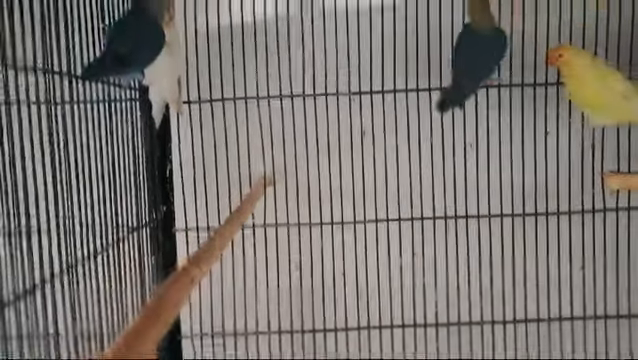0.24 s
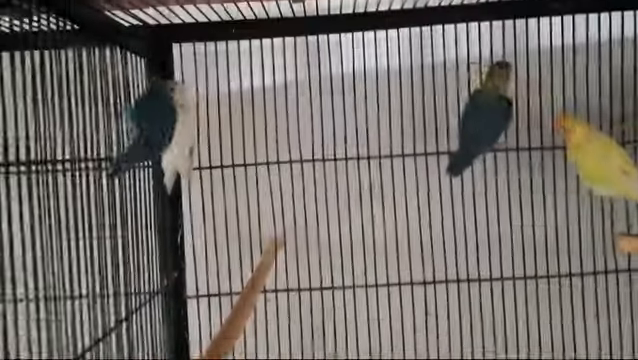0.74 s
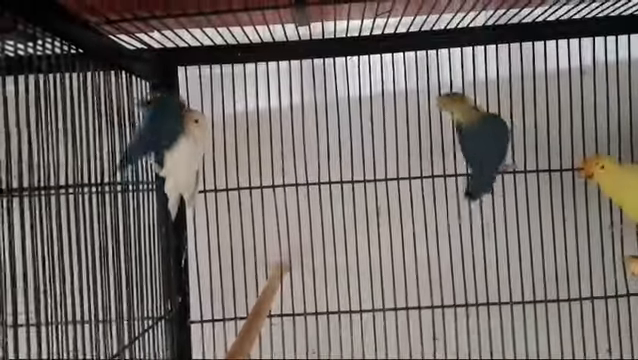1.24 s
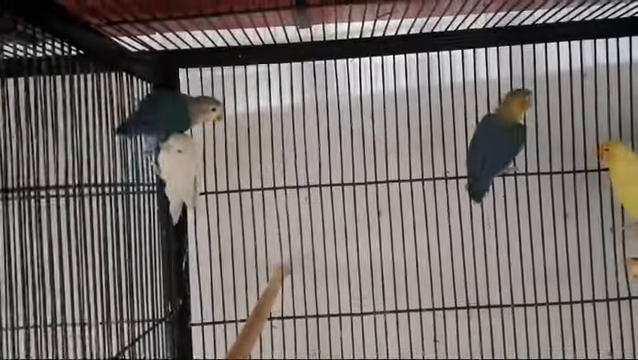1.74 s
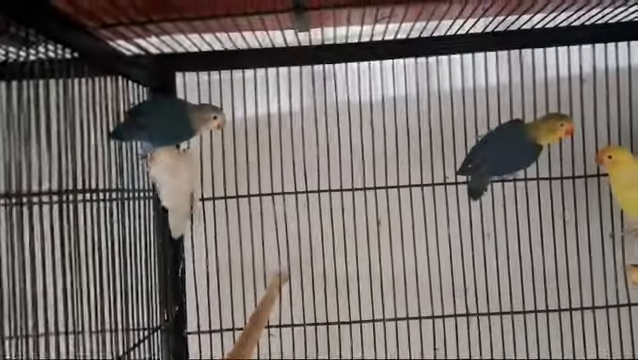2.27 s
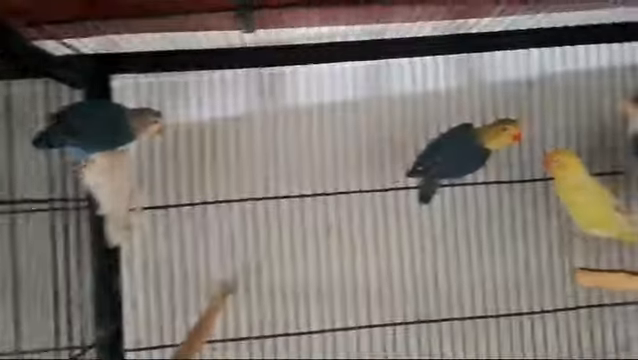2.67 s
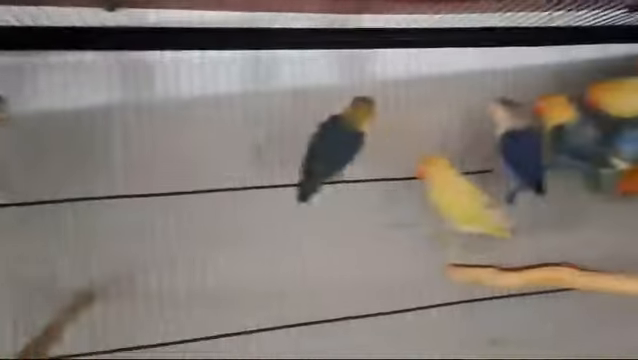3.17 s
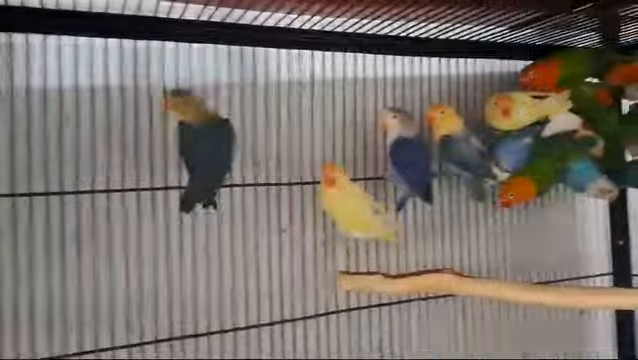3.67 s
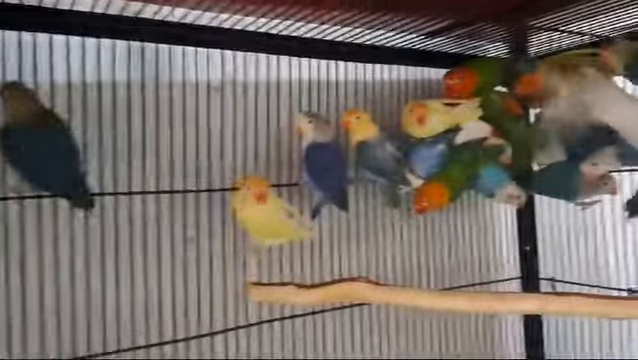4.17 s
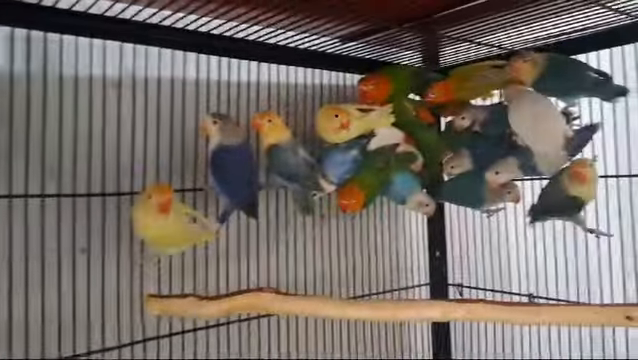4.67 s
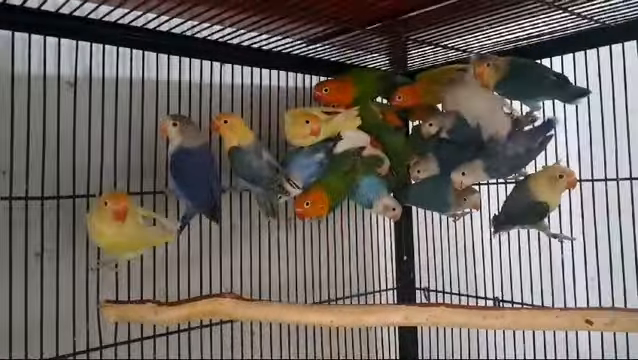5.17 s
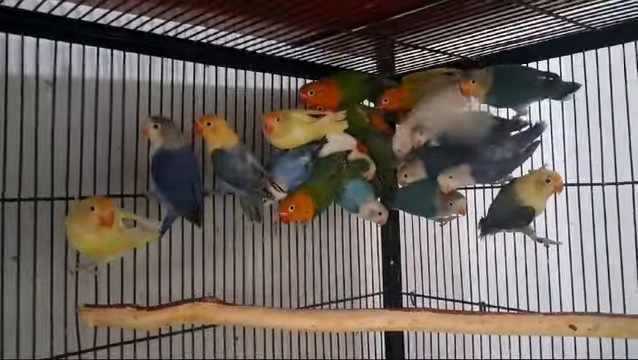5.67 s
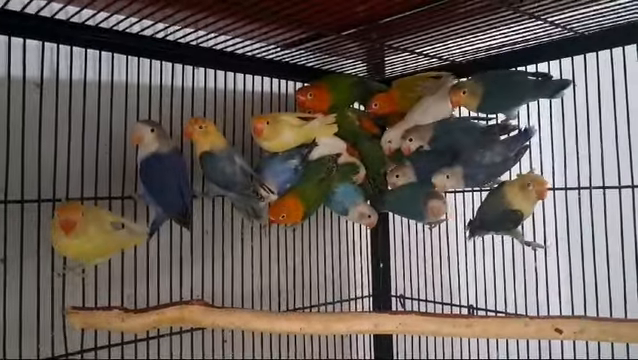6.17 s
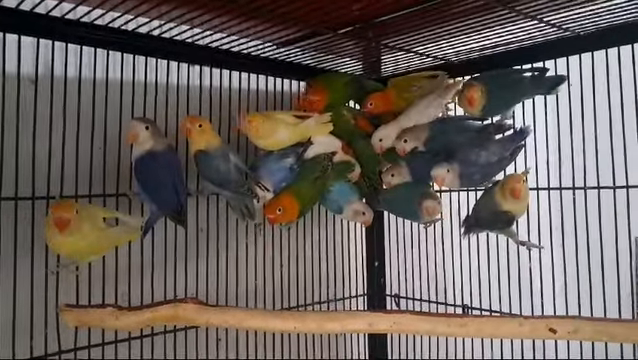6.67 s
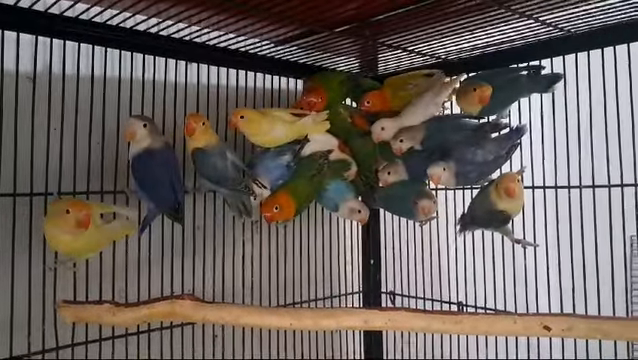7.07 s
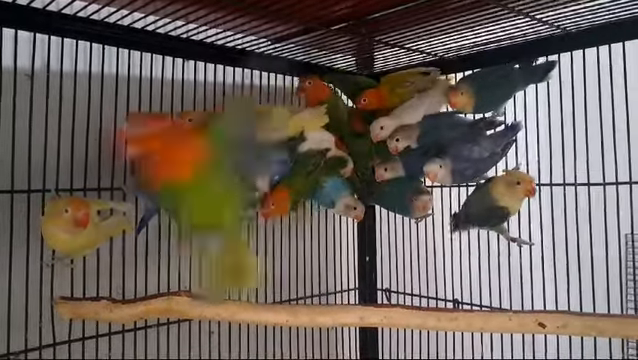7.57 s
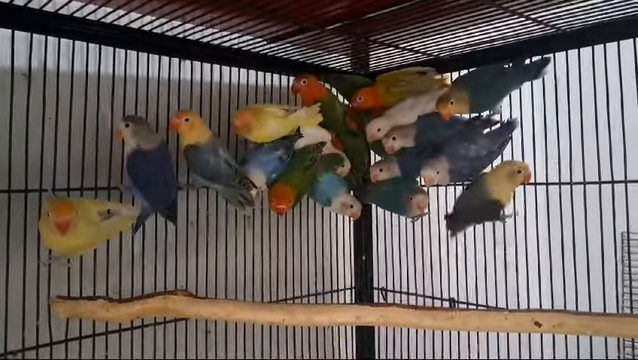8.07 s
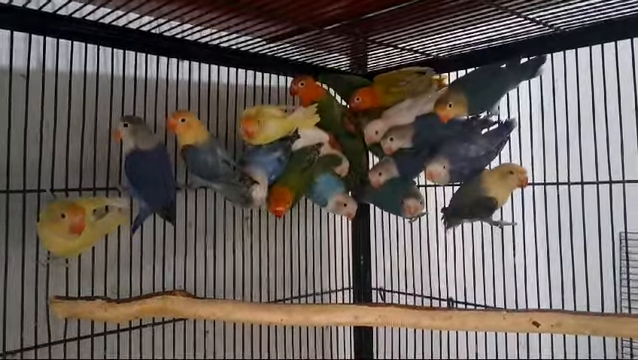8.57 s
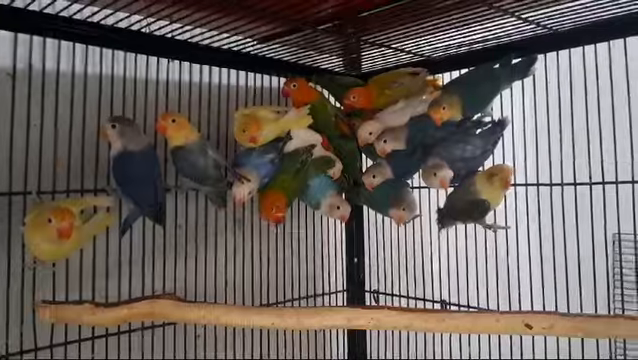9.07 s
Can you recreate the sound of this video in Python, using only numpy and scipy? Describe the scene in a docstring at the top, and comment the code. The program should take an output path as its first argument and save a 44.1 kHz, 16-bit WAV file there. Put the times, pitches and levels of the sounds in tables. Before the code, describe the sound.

Lovebirds chatter close to the microphone in a wire cage, mostly a little to the right, and the small hard room rings briefly after each call. From the start, short, shrill chirps and squeaks mix with reedy squawks and dry beak ticks. The birds fall almost silent from about 2.3 to 2.9 seconds, then chirp again, several calls a second, with a few more ticks around 4 to 6.5 seconds. Between 6.3 and 7.2 seconds a squabble brings three harsh, pulsing rasps, and rough squawks carry on until 7.8 seconds. Around 8 seconds a soft, low gust from wings brushes the microphone. After another short lull, chirps return from 8.7 seconds to the end, just past 9 seconds. Further off, the rest of the flock twitters and rustles its feathers in swelling bouts, over a faint low hum and room tone.

```python
"""Lovebirds chatter in a wire cage in a small hard room, close to a camera's stereo microphone.
Each bird sings with a membrane in its syrinx, coloured by throat and beak: most chirps start in a
reedy low register and break into a whistle, squawks stay low, and squabbling birds rasp in pulses.
Beaks tick nearby and the room rings. Further off the flock twitters and feathers rustle;
wing draught brushes the microphone, over a low hum and room tone."""
import sys
import numpy as np
from scipy import signal
from scipy.fft import rfft, irfft, next_fast_len
from scipy.io import wavfile
from scipy.ndimage import map_coordinates

SR = 44100
rng = np.random.default_rng(int(sys.argv[2]) if len(sys.argv) > 2 else 0)


def put_to_file(sound):
    """Save the sound as 16-bit audio at rate SR, in the file named by the first command-line argument."""
    columns = np.atleast_2d(sound).T  # one column per channel
    safe = np.clip(columns, -1, 1)
    whole_steps = np.round(safe * 32767)
    wavfile.write(sys.argv[1], SR, whole_steps.astype(np.int16))


N = 411453
TOP_HZ = 16000  # the microphone's band limit

OPENING_HZ, OPENING_S = 2131, 0.0098  # pitch and usual length of a chirp's reedy opening
SCOOP_CARRY, DROOP = 0.24, .045  # share of the scoop that carries on past the crest; final sag
CLEAN_SCOOP = 0.12  # the further from this arc, the rougher the whistle
# Chirps close to the microphone; a negative scoop falls to the crest from above.
# (time [s], opening [s, 0 = none], whistle [s], crest [Hz], scoop [share of crest],
#  relative level [dB], treble against body [dB], left minus right [dB])
NEAR_CHIRPS = [(.201, 0, 0.015, 5960, 0.064, -12.5, -30, -9.5),
               (0.633, 0, 0.021, 6300, -.05, -12.5, -7.5, -12.5),
               (0.65, 0.00067, .038, 6640, .14, -11, -11, -11),
               (.82, 0.00085, 0.022, 6390, -0.17, -12.5, -9.5, -13.5),
               (.844, 0, 0.02, 4334, -.05, -12.5, -6, -3), (.864, 0, 0.029, 6890, .11, -9.5, -15, -5.5),
               (.986, 0.011, 0.05, 6110, .07, -15, -9, -16.5),
               (1.042, 0.0025, .058, 6790, 0.036, -13, -21, -12),
               (1.096, 0.0014, .06, 5970, -0.13, -13, -12, -8.5),
               (1.288, 0.0037, 0.021, 6370, .24, -12.5, -11.5, -3.5),
               (1.325, 0.0025, 0.043, 5240, -.1, -17, -15, -9),
               (1.495, 0.00025, 0.017, 6210, .08, -10.5, -15, -8),
               (1.561, 0.0066, 0.017, 4710, 0.29, -23, -12.5, 3),
               (1.64, 0.0023, .035, 4767, .08, -21, -7, -3),
               (1.743, 0.0039, .036, 4620, .11, -26.5, 1, -3.5),
               (1.832, 0.0033, 0.035, 4590, 0.091, -24.5, -3, -2.5),
               (1.928, 0.0065, .03, 4450, 0.034, -24.5, -1, -5),
               (2.059, 0.00061, .036, 5540, 0.19, -15, -14, -2),
               (2.163, 0.0039, 0.045, 5580, 0.18, -15, -16, -7),
               (2.972, 0.0033, .067, 5210, .1, -17.5, -13.5, -4),
               (2.986, 0.0027, 0.04, 6547, .06, -13.5, -17.5, -7),
               (3.297, 0.021, 0.038, 5470, .15, -12.5, -11.5, -3),
               (3.329, 0.00065, 0.047, 6570, .09, -16, -12.5, -9.5),
               (3.416, 0.0064, 0.024, 6260, .08, -15.5, -7, -10),
               (3.488, 0.0011, 0.037, 5490, .04, -13.5, -17.5, -6.5),
               (3.521, 0, 0.03, 4376, .1, -13, -13, 2), (3.541, 0.0033, 0.039, 5380, 0.2, -12.5, -10, -1.5),
               (3.56, 0.0022, .031, 6710, .04, -17, -16.5, -8.5),
               (3.619, .016, 0.026, 6270, 0.21, -19, -21, -10.5), (3.845, 0, 0.072, 6360, .04, -14, -9, -7),
               (3.887, 0.0012, .038, 5455, .14, -10.5, -15, 1.5),
               (4.05, 0.0001, .015, 6500, .2, -24.5, -13.5, -4.5),
               (4.131, 0.01, .037, 5340, 0.082, -11.5, -9.5, 3),
               (4.289, 0.015, 0.027, 6320, 0.17, -18.5, -22.5, -1),
               (4.369, .011, .032, 5316, .1, -11.5, -8.5, 0),
               (4.458, 0.0085, 0.037, 6200, .12, -14, -12.5, -12),
               (4.597, .012, 0.033, 5330, .13, -12.5, -11.5, -3),
               (4.846, 0.01, 0.026, 5356, 0.12, -10.5, -15, -5.5),
               (5.054, 0.0067, 0.02, 4480, .18, -13, -9.5, -9),
               (5.122, 0.0016, .018, 4330, -.13, -10, -14, -12), (5.142, 0, .055, 6050, 0, -14, -14, -10),
               (5.195, 0.0036, .016, 4314, -0.094, -14.5, -17.5, -8),
               (5.25, 0.0058, 0.025, 6220, .09, -15.5, 3, -16.5),
               (5.362, 0.0074, .027, 5448, .1, -13, -8, -6), (5.389, 0, 0.015, 6470, .1, -23, -8, -19),
               (5.461, .01, .033, 5166, -.07, -11.5, -11, -6.5),
               (5.522, 0.012, 0.026, 5910, .05, -22, -5, -10),
               (5.554, 0.017, 0.024, 5390, -.15, -12.5, -9.5, -7),
               (5.653, 0.0092, .03, 5273, -.14, -16.5, -7.5, -11.5),
               (5.704, 0.00026, 0.031, 6224, 0.21, -15.5, -15, -9),
               (5.748, .011, 0.04, 5300, -0.22, -17, -5, -7.5), (5.794, 0, .036, 4240, .08, -18, -19, -7),
               (5.843, 0.0004, .044, 6474, .07, -16.5, -13, -6),
               (6.061, .02, 0.028, 6150, 0.005, -15.5, -14, -6),
               (6.132, 0.011, 0.024, 6300, .13, -22.5, -9, -16),
               (6.188, 0.0061, .026, 6210, .14, -18.5, 3.5, -20.5),
               (6.235, 0, .026, 6180, 0, -21.5, -12.5, -7),
               (6.346, 0.00095, .038, 6190, .01, -14.5, -13.5, -7),
               (6.484, 0.0045, .042, 5930, .08, -18, -10, -4.5),
               (6.606, 0, .034, 5771, 0.048, -16.5, -8.5, -13.5),
               (6.642, 0.00051, .024, 6500, .1, -12.5, -18.5, -14),
               (6.733, 0.017, 0.049, 5740, 0.22, -15, -10, -9),
               (6.841, 0.00016, .03, 6340, 0.11, -13.5, -14, -9.5),
               (6.905, 0, 0.029, 5870, 0, -14, -8.5, -8), (7.698, 0.014, 0.035, 5820, 0.18, -15.5, -6, -11),
               (7.831, 0.0072, 0.033, 5450, 0.11, -14.5, -7.5, -10),
               (7.944, .01, 0.031, 5395, .06, -18, -5, -7.5),
               (8.049, 0.0035, .028, 6160, .06, -14.5, -2, -16), (8.553, 0, .065, 6520, -.16, -34, -10, -7),
               (8.716, 0.0099, 0.025, 6270, 0.0012, -13, -5, -13.5),
               (8.748, 0.00023, .036, 5370, -0.046, -14, -12, -13),
               (8.92, 0.0094, .032, 6040, .12, -11.5, -13, -7),
               (9.118, .014, .04, 4330, .09, -12.5, -16, -9.5),
               (9.17, 0, 0.072, 6467, .09, -13.5, -13, -7.5)]


def chirps():
    """A short reedy opening breaks with a crack into a whistle that scoops to its crest."""
    out = np.zeros((2, N))
    for s, opening, length, crest, scoop, db, bright_db, pan_db in NEAR_CHIRPS:
        if opening > 0:
            low = reed(opening + 0.0016, OPENING_HZ * rng.normal(1, .02), rise=.05, rough=0.41)
            low = beak(low, .5 * bright_db - 3)  # the beak is only partly open
            # a longer opening spreads the same push and is softer
            push_db = db - 1.5 - 3 * max(np.log2(opening / OPENING_S), 0)
            add(out, s, perch(low, push_db, 0.19 * pan_db))  # beamed less to one side
        contour = crest * np.array([1 - scoop, 1, 1 + SCOOP_CARRY * scoop - DROOP])
        rough = 0.092 + 1.12 * abs(scoop - CLEAN_SCOOP)
        whistle = syrinx(length, contour, rough, jitter=0.096, flutter=12, hiss=1.3)
        n = len(whistle)
        crack = .75 * noise(THROAT_GAIN, n) * np.exp(-np.arange(n) / SR / .004)
        call = (whistle + crack) * swell(n, attack_s=.0025, release_s=.008)
        add(out, s + opening, perch(beak(call, bright_db), db, pan_db))
    return out


# Resonance of the throat and open beak: (frequency [Hz], gain [dB])
THROAT_GAIN = [(1400, -57), (1900, -19.5), (2300, -11), (2750, -5.5), (3300, -3.5), (4300, 2.5), (5400, 5),
               (6600, 1), (7700, -7.5), (9000, -9.5), (10500, -5), (12400, -1), (13500, -7), (16000, -19)]


def syrinx(length, contour, rough, jitter, flutter, hiss, warble=.035, lift=0, lift_s=0.00387):
    """A membrane glides through three pitches; roughness shakes it and adds turbulence."""
    n = int(length * SR)
    progress = np.arange(n) / n
    start, crest, end = contour
    approach = np.clip(1 - progress / .35, 0, 1) ** 2
    departure = np.clip((progress - .35) / .65, 0, 1) ** 2
    pitch = crest + (start - crest) * approach + (end - crest) * departure
    flick = lift * np.exp((progress - 1) * length / lift_s)  # upward, as the note stops
    pitch *= 1 + (0.006 + warble * rough) * wobble(219, n) + flick
    phase = phase_of(pitch * (1 + jitter * rough * wobble(1102.5, n)))
    harmonic = np.arange(1, 9)[:, None]
    gains = amp(along(THROAT_GAIN, harmonic * pitch)) * (harmonic * pitch < TOP_HZ)
    tone = np.sum(gains * np.sin(harmonic * phase), axis=0)
    shake = amp(flutter * rough * np.tanh(wobble(400, n)))  # the membrane's swing is bounded
    return (unit(tone) + hiss * rough ** 2 * noise(THROAT_GAIN, n)) * shake


def reed(length, hz, rise, rough):
    """The membrane's wavering low register; the shorter the note, the more abruptly it starts."""
    contour = hz * np.array([1 - .35 * rise, 1, 1 + .65 * rise])
    note = syrinx(length, contour, rough, jitter=.08, flutter=5.4, hiss=1.47, warble=0.0467, lift=.1)
    return note * swell(len(note), attack_s=0.13 * length, release_s=0.0032)


def beak(call, bright_db, treble_hz=7600):
    """The beak's opening sets the strength of the treble against the body of the call."""
    body = filtered(call, lambda hz: 1 / (1 + (hz / treble_hz) ** 24))
    return unit(body) + amp(bright_db) * unit(call - body)


def perch(call, db, pan_db, lag_s=.0004, wall_db=-12, reach_s=.022, echoes=8):
    """A call meets the microphone's left port first; nearby walls and roof add quick echoes."""
    paths = np.zeros((2, int(reach_s * SR) + 200))
    right_delay = int(abs(lag_s * SR * rng.normal(1, .15)))
    paths[0, 0] = paths[1, right_delay] = 1
    for port in paths:
        late = rng.uniform(.06, 1, echoes)
        strength = amp(wall_db) * rng.standard_normal(echoes) * (1.3 - late)
        port[(late * reach_s * SR).astype(int)] += strength
    pair = signal.fftconvolve(call[None], paths, axes=1)
    pair *= np.linalg.norm(call) / np.linalg.norm(pair, axis=1, keepdims=True)
    balance = unit(amp(np.array([pan_db, -pan_db]) / 2))[:, None]
    return amp(db) * balance * pair


# Squawks close to the microphone: (time [s], length [s], pitch [Hz], rise [share of pitch],
#  roughness [0-1], relative level [dB], left minus right [dB])
NEAR_SQUAWKS = [(0.136, 0.047, 2015, 0, 1, -28, -6.5), (.2, 0.033, 2173, 0.087, 0.4, -23, -2),
                (0.293, .04, 2258, .02, .7, -23, -3), (1.02, 0.026, 2031, -0.0017, .25, -14.5, -7),
                (1.045, 0.048, 2250, -0.081, .35, -19.5, -3.5),
                (1.213, 0.044, 2383, -0.012, .4, -16.5, -9.5),
                (1.249, 0.036, 2200, -0.064, .55, -18.5, -3.5), (1.42, 0.075, 2442, .05, .6, -17, -5.5),
                (2.02, 0.034, 1990, -0.13, 0.6, -22, -6), (2.105, 0.052, 2087, .2, .4, -23, -4),
                (2.895, .033, 2080, .15, 0.2, -17, -5), (2.92, .05, 2393, .02, .18, -16.5, -5),
                (2.967, 0.023, 2536, 0.094, .2, -14, -1), (3.475, 0.06, 2660, 0, .4, -21, -1),
                (3.805, 0.041, 2140, 0.23, 0.2, -16.5, -4.5), (3.848, 0.044, 2170, -0.071, 0.4, -20, 1.5),
                (5.115, 0.041, 2200, -.06, 0.5, -20.5, -3.5), (5.821, 0.023, 2247, 0.0074, 0.1, -18, -3),
                (6.289, 0.064, 2617, .13, .6, -22.5, -4.5), (6.586, 0.082, 2287, 0, .4, -20.5, -2),
                (6.882, 0.023, 2107, -.06, .4, -24, -7.5), (6.956, 0.068, 2880, -.13, .5, -16.5, -5.5),
                (7.028, 0.069, 2505, -.16, .8, -14.5, -4.5), (7.249, 0.022, 2496, -.2, 0.5, -19, -5),
                (7.271, 0.072, 2880, .13, .7, -18, -5.5), (7.443, 0.0085, 2180, 0.33, .4, -19, -17),
                (7.457, 0.1, 2695, -.04, 0.7, -16, -4), (7.628, 0.064, 2626, -.12, .5, -17.5, -3),
                (7.766, 0.057, 2524, -0.2, .8, -19.5, -5.5)]


def squawks(full_effort_db=-19, fundamental_top_hz=3100):
    """Held reedy notes, nasal to harsh; below full effort the fundamental gains on the overtones."""
    out = np.zeros((2, N))
    for s, length, hz, rise, rough, db, pan_db in NEAR_SQUAWKS:
        mellow_db = 1.2 * np.clip(full_effort_db - db, -1, 6)
        note = reed(length, hz, rise, rough)
        note = filtered(note, lambda f: amp(mellow_db / (1 + (f / fundamental_top_hz) ** 20)))
        add(out, s, perch(beak(note, bright_db=-8.5), db, pan_db))
    return out


# A close squabble, louder in the right channel: (time [s], length [s], start pitch [Hz],
#  end pitch [Hz], relative level [dB], left minus right [dB])
NEAR_RASPS = [(6.33, .19, 3150, 4570, -21.5, -8), (6.521, 0.25, 4450, 4930, -27.5, -9.5),
              (7.02, .18, 3400, 4500, -17.5, -4.5)]


def rasps(pulse_hz=132, sweep=0.065, spread=.037, hiss=0.48):
    """Harsh scolding: a flutter chops a swelling, climbing tone into bursts, each sweeping upward."""
    out = np.zeros((2, N))
    for s, length, start_hz, end_hz, db, pan_db in NEAR_RASPS:
        n = int(length * SR)
        beat = phase_of(pulse_hz * (1 + .05 * wobble(60, n)))
        pitch = np.linspace(start_hz, end_hz, n) * (1 + sweep * np.sin(beat) + spread * wobble(1500, n))
        tone = unit(np.sin(phase_of(pitch)))
        pulses = amp(10 * np.cos(beat) + 1.3 * wobble(101, n))
        rasp = (tone + hiss * noise(THROAT_GAIN, n)) * pulses * swell(n, attack_s=.1, release_s=.03)
        add(out, s, perch(beak(rasp, bright_db=-12), db, pan_db, wall_db=-19))
    return out


# Close beak ticks, louder in the right channel: (time [s], relative peak level [dB])
NEAR_TICKS = [(0.0513, -19), (0.0725, -17), (0.1426, -8), (0.2697, -11.5), (0.3698, -14.5), (0.4346, -14),
              (0.5045, -12), (0.5698, -9.5), (0.7033, -11), (0.77, -9.5), (0.9783, -13.5), (1.3582, -11),
              (4.0444, -15), (4.6862, -9.5), (4.7465, -18), (4.806, -16), (4.8968, -18.5), (5.033, -10),
              (5.2214, -15), (6.0146, -16.5), (6.5549, -6.5)]


def beak_ticks(rise_s=.0006, decay_s=0.0025):
    """A beak snaps: a dry, bright burst of noise that dies at once."""
    out = np.zeros((2, N))
    t = np.arange(SR // 50) / SR
    spectrum = [(1500, -36.5), (2500, -10), (4200, 7), (5800, 9), (8000, -7.5), (12000, -8),
                (16000, -26.5)]
    envelope = (1 - np.exp(-t / rise_s)) * np.exp(-t / decay_s)
    for s, db in NEAR_TICKS:
        snap = noise(spectrum, len(t)) * envelope
        add(out, s, perch(snap / np.abs(snap).max(), db + 2.5, pan_db=-4.5, wall_db=-13))
    return out


# The hard room around the cage: (frequency [Hz], time to fall 60 dB [s])
RING_TIMES = [(300, 0.39), (2500, 0.81), (5500, 0.58), (8000, 0.49), (13000, 0.33)]


def room_ring(birds, build_s=0.015):
    """The bare room rings on after each call, longest in the middle treble."""
    hz, t, bands = signal.stft(rng.standard_normal((2, SR)), SR, nperseg=256)
    decay = amp(-60 * t / along(RING_TIMES, hz)[:, None])
    build = 1 - np.exp(-t / build_s)
    _, tail = signal.istft(bands * decay * build, SR, nperseg=256)
    tail /= np.linalg.norm(tail, axis=1, keepdims=True)
    mono = 0.52 * birds[:1] + 1.05 * birds[1:]
    return signal.fftconvolve(mono, tail, axes=1)[:, :N]


# Excitement of the flock further off, swelling in three bouts: (time [s], relative level [dB])
FLOCK_EXCITEMENT = [(0, -30), (.75, -36.5), (1.15, -27), (1.3, -22.5), (2.18, -29.5), (2.5, -62.5),
                    (3.3, -49), (3.48, -22), (4.25, -40), (4.8, -23), (5.33, -35.5), (5.55, -32.5),
                    (5.9, -30.5), (6.25, -22), (7.15, -28), (7.98, -32), (8.3, -57.5), (9.33, -41.5)]


def flock(busy_db=-28, hush=0.33):
    """Twitter and rustle follow the flock's excitement; the voices fall silent first in a lull."""
    level_db = timeline(FLOCK_EXCITEMENT)
    lull_db = hush * np.minimum(level_db - busy_db, 0)
    stir = amp(-3 + lull_db) * far_twitter() + amp(-6) * feathers()
    return amp(level_db) * amp([[-1.5], [1.5]]) * stir


def far_twitter(count=260):
    """Birds further from the microphone give short, breathy whistles at random moments."""
    out = np.zeros((2, N))
    for when, pitch, size, side in rng.random((count, 4)):
        contour = (4400 + 1700 * pitch) * np.array([.88, 1, .96])
        note = syrinx(.025, contour, rough=.45, jitter=0.067, flutter=8, hiss=2.5)
        note *= swell(len(note), attack_s=0.0022, release_s=0.008)
        add(out, when * N / SR, perch(beak(note, bright_db=-12.5), db=5 * size, pan_db=10 * side - 7))
    return unit(out)


def feathers():
    """Feathers rustle around the cage: a bright noise whose level flickers."""
    spectrum = [(1500, -42.5), (2300, -5.5), (3300, -8), (4800, 3), (6300, -0.5), (8000, -20.5),
                (12000, -13.5), (16000, -27)]
    return amp(2.8 * wobble(60, N)) * diffuse(spectrum)


# Rumble of moving air right at the microphone: (frequency [Hz], relative level [dB])
DRAUGHT_SPECTRUM = [(18, -24), (32, -4), (65, 3), (120, -10.5), (160, -18.5), (300, -29), (550, -89)]
# Gusts from passing wings: (middle time [s], half length [s], relative level [dB])
WING_GUSTS = [(1.299, .12, -51), (3.52, 0.18, -55), (5.449, 0.21, -47), (7.903, 0.47, -37),
              (8.58, .13, -39)]


def wing_draught():
    """Wings push soft gusts over the microphone, with a faint draught between them."""
    t = np.arange(N) / SR
    gusts = sum(amp(db) * np.exp(-((t - s) / half) ** 2) for s, half, db in WING_GUSTS)
    return (amp(-54) + gusts) * amp(-2 + 2.5 * wobble(22, N)) * diffuse(DRAUGHT_SPECTRUM)


def hum(hz=55, db=-55):
    """A low hum fills the room, wavering in pitch and level."""
    tone = unit(np.sin(phase_of(hz * (1 + 0.02 * wobble(24, N)))))
    return amp(db + 1.4 * wobble(4.6, N)) * tone


# Room tone all around the microphone: (frequency [Hz], relative level [dB])
ROOM_TONE_SPECTRUM = [(60, -36.5), (100, -15.5), (160, -1), (210, -10), (270, -3), (450, -8.5),
                      (800, -11.5), (1050, -10.5), (1700, -17.5), (3000, -23.5), (8000, -36),
                      (16000, -35.5)]
# Room tone under the camera's changing gain: (time [s], relative level [dB])
ROOM_TONE_GAIN = [(0.0, -53.5), (0.54, -50), (1.63, -55), (4.41, -50), (6.24, -58.5), (7.85, -48),
                  (8.11, -51), (9.33, -50)]


def room_tone():
    """Room tone dips, along a set curve, as the camera turns its gain down for loud birds."""
    level_db = timeline(ROOM_TONE_GAIN) + 4 + 1.1 * wobble(7.8, N)
    return amp(level_db) * diffuse(ROOM_TONE_SPECTRUM)


# Sound from all around at the microphone's two ports: (frequency [Hz], left-right likeness [0-1])
PORT_LIKENESS = [(60, 0.92), (250, 0.94), (500, 0.62), (1000, 0.051), (8000, 0.075)]


def diffuse(spectrum):
    """Stereo noise, alike in the bass and unrelated in the treble."""
    def mid_side_gains(hz):
        width = np.arccos(along(PORT_LIKENESS, hz)) / 2
        return amp(along(spectrum, hz)) * [np.cos(width), np.sin(width)]
    mid, side = filtered(rng.standard_normal((2, N)), mid_side_gains)
    return unit(np.array([mid + side, mid - side]))


def noise(spectrum, n):
    """Noise of rms 1, coloured by (frequency [Hz], level [dB]) points."""
    return unit(filtered(rng.standard_normal(n), lambda hz: amp(along(spectrum, hz))))


def filtered(x, gain):
    """x times a gain that depends on frequency."""
    n = x.shape[-1]
    size = next_fast_len(n + 1024)
    return irfft(rfft(x, size) * gain(np.fft.rfftfreq(size, 1 / SR)), size)[..., :n]


def wobble(rate, n):
    """A smooth random curve of n samples, rate knots a second."""
    return map_coordinates(rng.standard_normal(int(n * rate / SR) + 4), [np.arange(n) * rate / SR])


def swell(n, attack_s, release_s):
    """Smooth opening and closing of a note."""
    t = np.arange(n) / SR
    opening = np.sin(np.pi / 2 * np.clip(t / attack_s, 0, 1))
    closing = np.sin(np.pi / 2 * np.clip((n / SR - t) / release_s, 0, 1))
    return opening * closing


def along(points, hz):
    """Join (frequency [Hz], value) points on a log axis."""
    freqs, values = np.transpose(points)
    return np.interp(np.log(np.abs(hz) + 1), np.log(freqs + 1), values)


def timeline(points):
    """Join (time [s], value) points, one value a sample."""
    return np.interp(np.arange(N) / SR, *np.transpose(points))


def add(track, s, sound):
    """Mix a stereo sound in at time s."""
    part = track[:, max(round(s * SR), 0):][:, :sound.shape[1]]
    part += sound[:, :part.shape[1]]


def phase_of(hz):
    return 2 * np.pi * np.cumsum(hz) / SR


def amp(db):
    return 10 ** (np.asarray(db) / 20)


def unit(x):
    """Each channel at rms 1."""
    return x / np.sqrt(np.mean(x ** 2, axis=-1, keepdims=True) + 1e-20)


def scene():
    """The near birds and their ring in the room, over the rest of the flock and the air."""
    birds = amp(-.5) * chirps() + amp(-1) * squawks() + amp(3) * rasps() + beak_ticks()
    ring = amp(-14.5) * amp([[-1], [1]]) * room_ring(birds)
    return birds + ring + flock() + wing_draught() + hum() + room_tone()


def record(dry):
    """The camera rounds off the highest peaks and keeps nothing above its band limit."""
    rounded = dry / (1 + np.abs(dry) ** 8) ** (1 / 8)
    return filtered(rounded, lambda hz: hz < TOP_HZ)


dry = scene()
out = record(dry)
put_to_file(out)
```